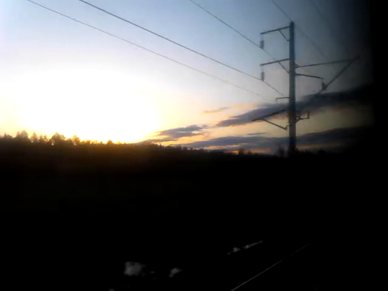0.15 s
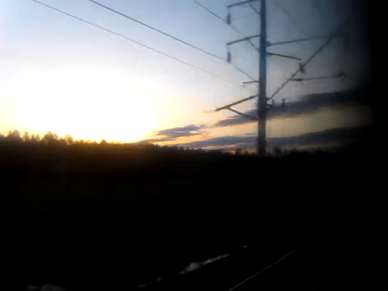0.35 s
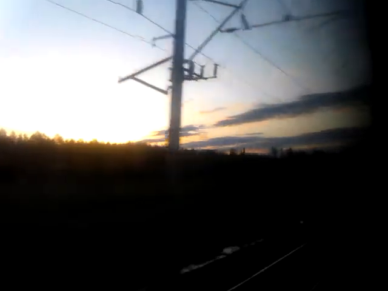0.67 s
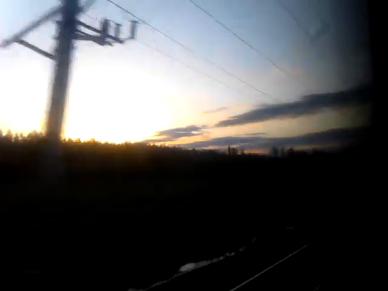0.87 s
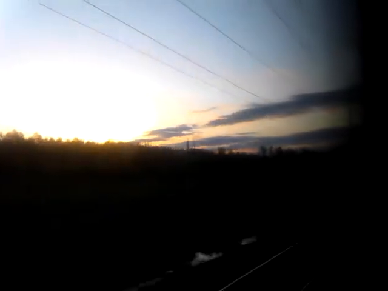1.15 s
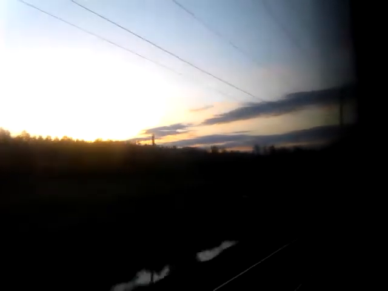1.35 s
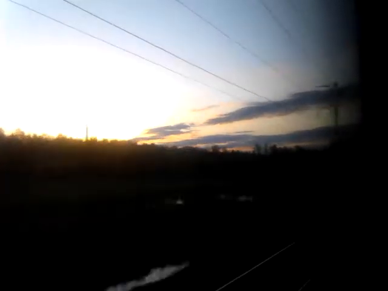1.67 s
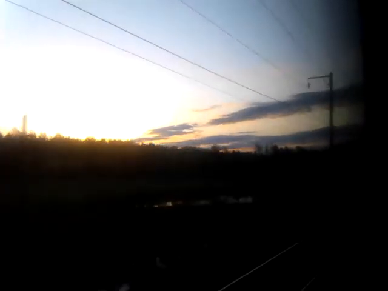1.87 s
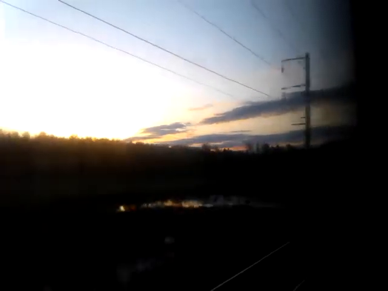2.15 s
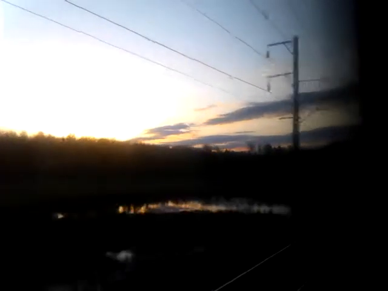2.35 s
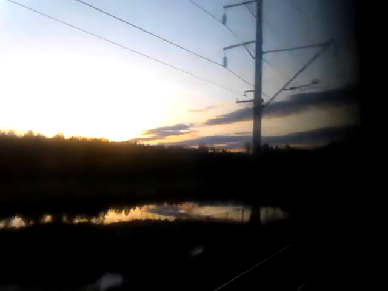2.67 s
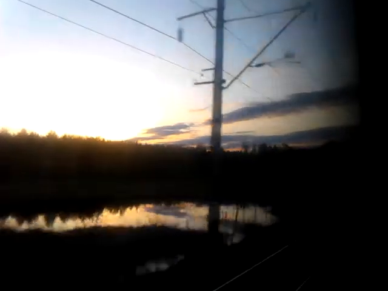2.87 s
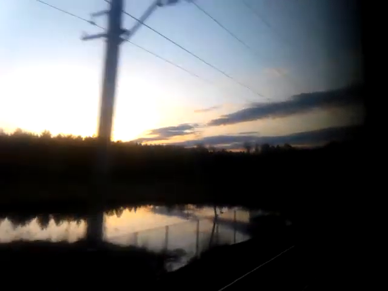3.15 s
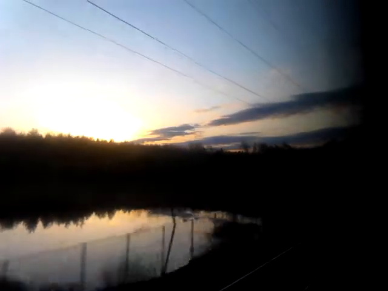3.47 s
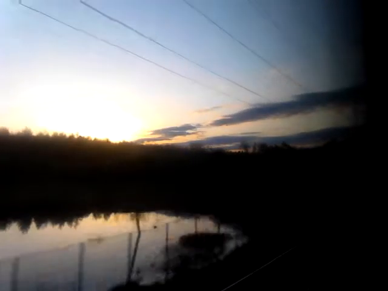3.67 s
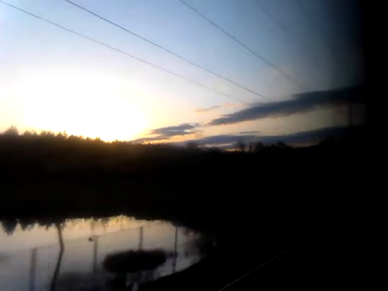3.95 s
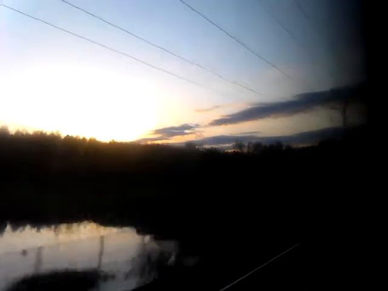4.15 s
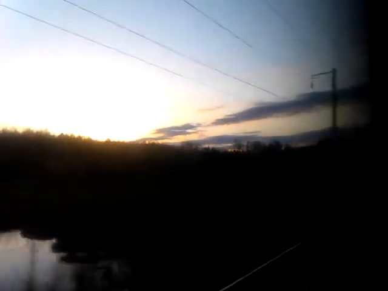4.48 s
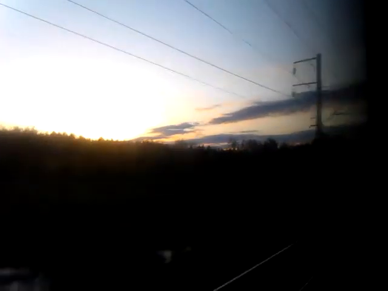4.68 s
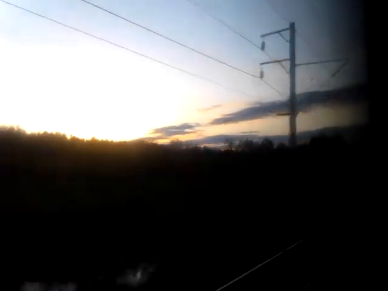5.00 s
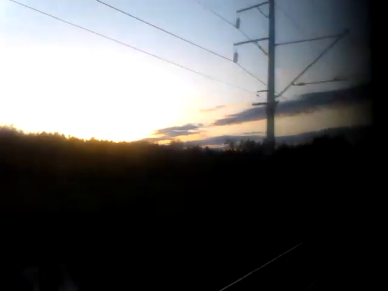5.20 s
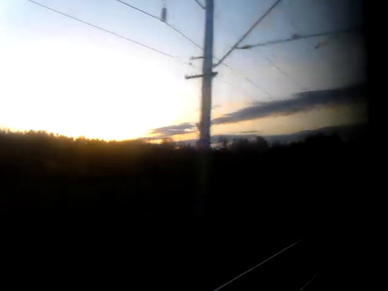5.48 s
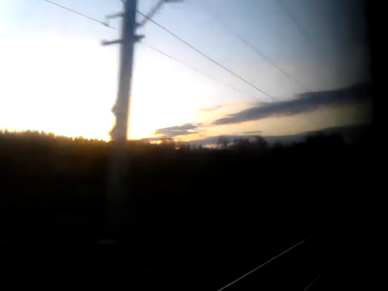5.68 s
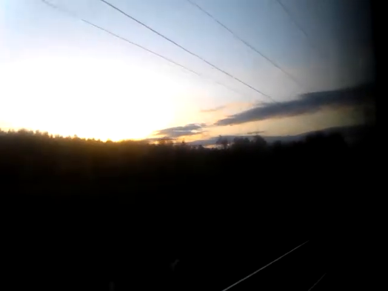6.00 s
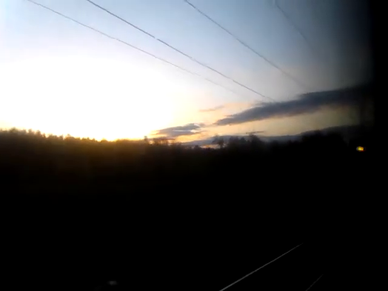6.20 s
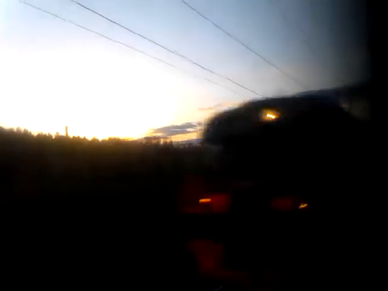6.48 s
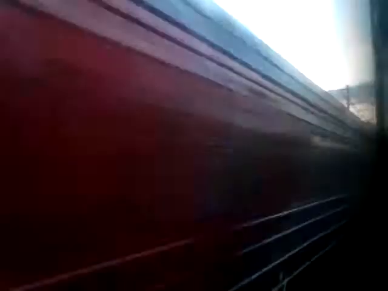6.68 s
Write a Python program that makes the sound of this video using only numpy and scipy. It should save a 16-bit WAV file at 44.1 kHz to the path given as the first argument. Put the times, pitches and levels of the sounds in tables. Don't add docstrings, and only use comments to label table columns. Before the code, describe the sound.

Train wheels knock unevenly over rail joints, rattling floor, door and walls inside a coach vestibule, above a steady low rolling rumble.

```python
import sys
import numpy as np
from scipy import signal
from scipy.io import wavfile
from scipy.ndimage import uniform_filter1d, minimum_filter1d

SR = 44100
rng = np.random.default_rng(int(sys.argv[2]) if len(sys.argv) > 2 else 0)


def how_loud(loudness_db):
    steps = np.asarray(loudness_db, float) / 20
    return 10 ** steps


def generate_wav(sig):
    pcm = np.round(np.clip(np.atleast_2d(sig).T, -1, 1) * 32767).astype(np.int16)
    wavfile.write(sys.argv[1], SR, pcm)


N = 301644


def evened(x):
    return x / np.sqrt(np.mean(x ** 2) + 1e-20)


def smoothed_twice(x, count):
    return uniform_filter1d(uniform_filter1d(x, count), count)


def add(mix, start_s, sound):
    part = mix[round(start_s * SR):][:len(sound)]
    part += sound[:len(part)]


def ring(x, hz, width_hz):
    radius = np.exp(-np.pi * width_hz / SR)
    turn = 2 * np.pi * hz / SR
    gain = np.sqrt(1 - radius) * np.sin(turn)
    return gain * signal.lfilter([1], [1, -2 * radius * np.cos(turn), radius ** 2], x)


def double_ring(x, hz, width_hz):
    return ring(ring(x, hz, width_hz), hz, 2 * width_hz)


def steadied(x, seconds, share):
    power = abs(smoothed_twice(x ** 2, int(seconds * SR)))
    return evened(x / (power + 1e-3 * np.mean(x ** 2)) ** (share / 2))


def rattle(modes, chance, count):
    settle = 4096
    jolts = chance.standard_normal((len(modes), count + settle))
    unevenness = evened(uniform_filter1d(chance.standard_normal(count + settle), 260))
    jolts *= how_loud(3.1 * unevenness)
    wander = evened(smoothed_twice(chance.standard_normal((len(modes), count)), 1800))
    luck_db = 1.6 * chance.standard_normal((len(modes), 1)) + 3.18 * wander
    sound = np.zeros(count)
    for jolt, luck, (hz, width_hz, db) in zip(jolts, luck_db, modes):
        ringing = double_ring(jolt, hz, width_hz)[settle:]
        sound += how_loud(db + luck) * steadied(ringing, seconds=0.025, share=0.43)
    return steadied(sound, seconds=0.036, share=0.26)


def shaking_db(t, lead_s, full_s, lasts_s, lag_s, under_db, sag_db):
    landing_s, release_s, release_db = 0.0075, 0.073, 20
    lead_db = under_db + 10.5
    top_s = max(min(full_s + lag_s, 0.66 * lasts_s), 0.002)
    times = [-lead_s - 0.02, -lead_s, -landing_s, 0, top_s,
             lasts_s, lasts_s + release_s, lasts_s + 2 * release_s]
    falls_db = [70, lead_db + 13.5, lead_db, under_db, 0, sag_db, sag_db + release_db, 90]
    return -np.interp(t, times, falls_db)


# frequency in Hz, width in Hz, level in dB.
FRAME_MODES = [(124.8, 12, -14.5), (152.3, 5.9, 2.5), (167.6, 14, -11.5)]
FLOOR_MODES = [(193.6, 9, -6.5), (208.9, 19, 3), (235.7, 23, -0.5), (254.5, 14, -0.5), (267.25, 6.8, -2.5),
               (295.4, 16, 1)]
DOOR_MODES = [(348.3, 34, 1.5), (406.7, 7.2, 3.5), (459.6, 44, 1.5), (522.5, 21, -6), (546.7, 61, -2.5),
              (587, 19, -3.5)]
WALL_MODES = [(680, 55, 0.5), (742.5, 30, 4), (808.2, 17, -1), (865.4, 17, -9.5), (927.6, 9.3, -7),
              (1027, 250, -6)]
FITTING_MODES = [(1212, 33, -5.5), (1350, 24, -6.5), (1534, 54, 1.5), (1624, 7.3, -4), (1740, 39, -5.5),
                 (1928, 22, -12.5), (2220, 160, -7), (2360, 32, -5), (2475, 54, -12), (2716, 96, -19),
                 (3000, 660, -22)]
# lag in s, under full at landing in dB, sag while shaking in dB.
PART_SHAPES = [
    (0.069, 8.5, 10.5),
    (0.0012, 4.5, 12),
    (0.035, 2.5, 12),
    (0.019, 3.5, 17.5),
    (.03, 9.5, 19.5),
    (.012, 5.5, 22.5),
]


def knock(blow, note, reach, chance):
    landing_s, strength_db, *timing = blow
    frame_hz, floor_hz, lower_hz, upper_hz, upper_db = note
    frame_db, door_db, walls_db, fittings_db, favour_db = reach
    start_s = -0.085 if landing_s < 0.1 else -0.16
    t = np.arange(start_s, 0.34, 1 / SR)

    frame = FRAME_MODES + [(frame_hz, 11, 0.5 + favour_db / 2)]
    floor = FLOOR_MODES + [(floor_hz, 12, 1 + favour_db)]
    door = [(hz, width_hz, db + upper_db * (hz > 475)) for hz, width_hz, db in DOOR_MODES]
    door += [(lower_hz, 13, 2 + favour_db / 2), (upper_hz, 13, favour_db / 2 + upper_db)]
    fittings = [mode for mode in FITTING_MODES if mode[0] < 2600]
    smallest = [mode for mode in FITTING_MODES if mode[0] >= 2600]
    parts = [(frame, frame_db), (floor, 0), (door, door_db), (WALL_MODES, walls_db),
             (fittings, fittings_db), (smallest, fittings_db - 13)]

    sound = np.zeros(len(t))
    for (modes, part_db), shape in zip(parts, PART_SHAPES):
        level = how_loud(strength_db + part_db + shaking_db(t, *timing, *shape))
        sound += level * rattle(modes, chance, len(t))
    return landing_s + t[0], sound


# landing in s, strength in dB, approach in s, full force after in s, shaking lasts in s.
BLOWS = [(.09, -21, .04, .01, 0.13), (0.339, -32, 0.028, .05, 0.097), (0.525, -31.5, 0.045, .02, 0.049),
         (0.887, -19.5, .04, 0.022, 0.2), (1.294, -30.5, 0.019, .05, .11), (1.547, -29, .03, 0.022, .13),
         (2.753, -20.5, 0.022, .005, 0.059), (2.994, -17, 0.035, .008, 0.16),
         (3.396, -25.5, 0.058, .08, 0.17), (3.626, -15, 0.035, .012, 0.16), (3.871, -28, .08, .03, 0.095),
         (4.253, -13.5, 0.076, .015, 0.15), (4.546, -38.5, .04, .015, 0.086),
         (4.945, -23.5, 0.058, .04, 0.12), (5.129, -36, 0.027, .02, 0.088), (5.242, -19, .04, 0.031, .17),
         (5.509, -22.5, 0.19, .03, .065), (5.751, -19.5, 0.021, .045, .15), (6.084, -26, 0.064, .035, .11),
         (6.321, -19.5, 0.025, .03, 0.14), (6.586, -37, 0.056, .015, 0.061), (6.8, -29, 0.076, .035, .1)]
# underframe in Hz, floor in Hz, lower door in Hz, upper door in Hz,
# upper over lower door in dB.
BLOW_NOTES = [(122.5, 268, 472, 540, -4), (127, 268, 456, 640, -7), (157, 198, 110, 538, -8),
              (176.6, 181.7, 430, 470, -1.5), (184.3, 273.6, 370, 910, -9), (153, 262.3, 460, 430, 0.5),
              (185, 200.3, 510, 490, -13), (150.8, 192, 460, 530, 2), (173, 265, 339, 420, -19),
              (150.6, 273.5, 413.7, 508, 2.5), (185, 270, 450, 490, -16), (151.3, 204, 333.4, 533, 2.5),
              (172.4, 340, 680, 498, 5), (157, 210, 390, 520, -4), (181, 202, 230, 780, 1),
              (184, 240, 342.5, 510, -0.5), (176.4, 262, 371.7, 270, -4), (157.7, 250, 459, 479, -3),
              (138.5, 277.7, 340.4, 410, -19.5), (153, 215.7, 770, 537.7, 6.5), (124.4, 150, 408, 483, -16),
              (153, 590, 280, 440, -10.5)]
# underframe in dB, door in dB, walls in dB,
# fittings in dB, favoured notes in dB.
BLOW_REACH = [(-3, -1, -14, -25.5, 2), (-17, -17, -36, -36, 16), (-15, -16, -20, -30, 5.5),
              (-1.5, -4.5, -11.5, -20.5, 2), (-17, -4, -19, -25, -4.5), (2.5, 4, -6.5, -20.5, 5.5),
              (-20, -29.5, -38.5, -38, 18.5), (-9, 0, -13.5, -20.5, 4.5), (-21.5, -4.5, -24, -34, 12),
              (-7.5, -6, -14, -24.5, -1), (-21.5, -10, -29, -31.5, 3.5), (-9.5, -6, -13.5, -22, 6.5),
              (-19, -21, -28, -33, 1), (-13.5, -10, -26.5, -26.5, 9), (-27, -25, -35, -38.5, 10),
              (-7.5, 0, -7.5, -24.5, -2), (-33.5, -6, -17, -31, 10), (-6.5, 0.5, -7, -23.5, -3.5),
              (-15, -2, -22, -27.5, 7), (0.5, -2, -11.5, -21, -4), (-6, 2, -16, -29, 3),
              (-5.5, -1, -6.5, -14.5, 1)]


def knocks(mix):
    for blow, note, reach, chance in zip(BLOWS, BLOW_NOTES, BLOW_REACH, rng.spawn(len(BLOWS))):
        start_s, sound = knock(blow, note, reach, chance)
        add(mix, start_s, sound)


def wash(spectrum, patchy_db):
    frames, hz = N // 512 + 5, np.fft.rfftfreq(2048, 1 / SR)
    real, imaginary, patches = rng.standard_normal((frames, 1025, 3)).T
    patches = evened(uniform_filter1d(uniform_filter1d(patches, 6, 0), 8, 1))
    point_hz, point_db = np.transpose(spectrum)
    colour_db = np.interp(np.log(hz + 1), np.log(point_hz + 1), point_db, -120, -120)
    z = (real + 1j * imaginary) * how_loud(colour_db[:, None] + patchy_db * patches)
    return evened(signal.istft(z, nperseg=2048, noverlap=1536)[1][:N])


# time in s, rumble level in dB.
ROUGHNESS = [(0.0, -36), (0.279, -44), (0.998, -42), (1.79, -45), (2.21, -39.5), (2.7, -44.5), (3.448, -46),
             (4.192, -47), (4.9, -48), (5.41, -40), (5.601, -43), (6.208, -44), (6.5, -42), (6.84, -44)]
# frequency in Hz, density in dB per Hz.
RUMBLE_SPECTRUM = [(29, -91.5), (50, -63.5), (75, -35.5), (104, -13), (146, 6), (162, -7), (184, -2),
                   (257, -6.5), (292, -25.5), (347, -21), (367, -19.5), (397, -15.5), (500, -18.5),
                   (650, -44), (1100, -120)]
ROAR_SPECTRUM = [(150, -20.5), (250, -2), (292, -4.5), (346, -8), (368, -9), (405, -9), (609, -14),
                 (887, -14.5), (945, -22), (1330, -20.5), (1470, -24), (1630, -21.5), (1880, -25.5),
                 (2320, -24.5), (3050, -33.5), (3960, -69), (6710, -120)]
# frequency in Hz, width in Hz, level in dB.
SHELL_HUMS = [(153, 12, -23.5), (405.3, 16, -11), (1661, 63, -17), (2387, 37, -23.5)]


def rolling():
    rumble_db = np.interp(np.arange(N) / SR, *np.transpose(ROUGHNESS))
    roar_db = -48.5 + 0.1 * (rumble_db - rumble_db.mean())
    hums = [how_loud(db) * evened(double_ring(rng.standard_normal(N), hz, width_hz))
            for hz, width_hz, db in SHELL_HUMS]
    rumble = wash(RUMBLE_SPECTRUM, patchy_db=2.5) + hums[0]
    roar = wash(ROAR_SPECTRUM, patchy_db=1.3) + sum(hums[1:])
    return how_loud(rumble_db) * rumble + how_loud(roar_db) * roar


def scene():
    mix = rolling()
    knocks(mix)
    return mix[None]


def low_pass(x, hz):
    longer = np.pad(x, ((0, 0), (400, 400)), "reflect", reflect_type="odd")
    taps = signal.firwin(801, hz, window=("kaiser", 9), fs=SR)
    return signal.oaconvolve(longer, taps[None], "valid")


def level_db(x):
    return 10 * np.log10(abs(uniform_filter1d(x ** 2, 1500)) + 1e-12)


def gate(wanted):
    return uniform_filter1d(minimum_filter1d(1. * wanted, 1500), 600)


def clipped(x):
    for _ in range(4):
        x = low_pass(np.clip(x, -0.35, 0.35), 3380)
    return x


# lower edge in Hz, upper edge in Hz, dropped this far under the whole in dB.
TREBLE_BANDS = [(2650, 2850, 51), (2850, 3050, 51), (3050, 3200, 50), (3200, 3400, 41)]


def faint_treble_dropped(x):
    kept = low_pass(x, 2650)
    for low_hz, high_hz, under_db in TREBLE_BANDS:
        band = low_pass(x, high_hz) - low_pass(x, low_hz)
        kept = kept + band * gate(level_db(band) > level_db(x) - under_db)
    return kept


# time of the middle in s, level in dB.
TREBLE_TICKS = [
    (.097, -71),
    (.884, -74),
    (2.998, -71),
]


def ticks():
    out, length_s = np.zeros(N), 0.018
    count = int(length_s * SR)
    for middle_s, db in TREBLE_TICKS:
        add(out, middle_s - length_s / 2, how_loud(db) * np.hanning(count) * rng.standard_normal(count))
    return out


# frequency in Hz, rms level in dB.
WHINE_TONES = [(7350, -80), (14700, -86)]


def whine(x):
    t = np.arange(N) / SR
    fuzz = how_loud(-17) * evened(low_pass(rng.standard_normal((1, N)), 300))
    tones = sum(np.sqrt(2) * how_loud(db) * np.sin(2 * np.pi * hz * t) for hz, db in WHINE_TONES)
    return tones * (1 + fuzz) * gate(level_db(x) < -31.5)


def band_limit(x):
    return signal.sosfilt(signal.butter(12, 15100, fs=SR, output="sos"), x)


def record(dry):
    bass_cut = signal.cheby2(8, 22, 86, "high", fs=SR, output="sos")
    x = clipped(signal.sosfilt(bass_cut, dry))
    return band_limit(faint_treble_dropped(x) + whine(x) + ticks())


dry = scene()
out = record(dry)
generate_wav(out)
```